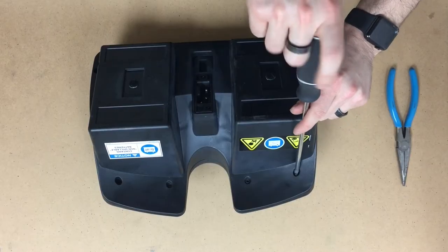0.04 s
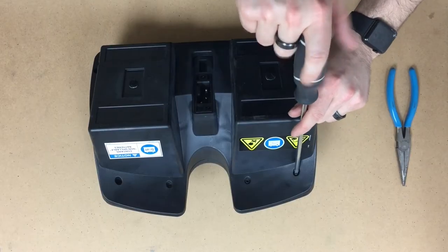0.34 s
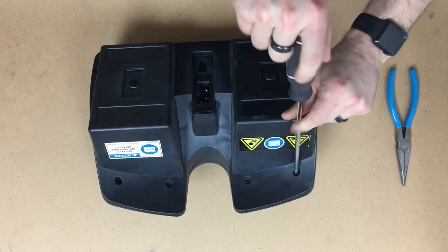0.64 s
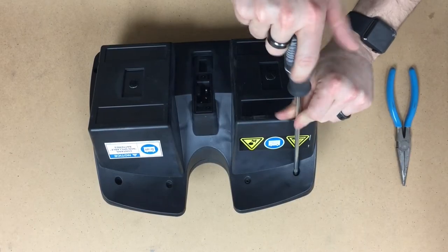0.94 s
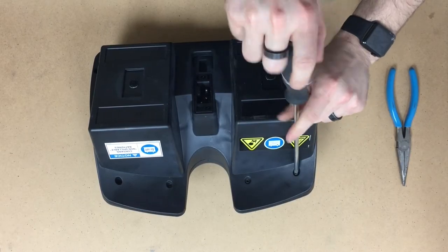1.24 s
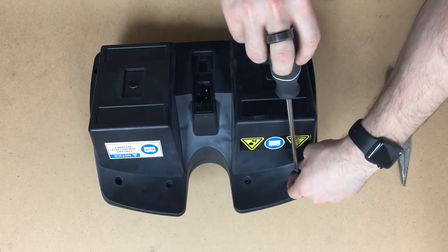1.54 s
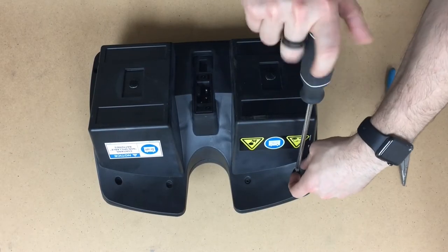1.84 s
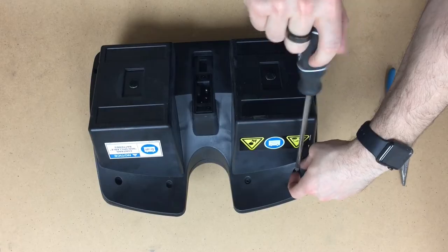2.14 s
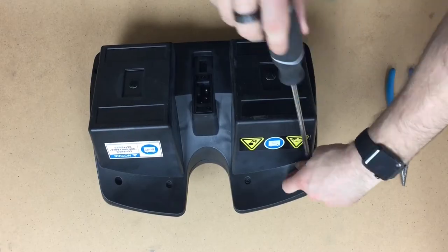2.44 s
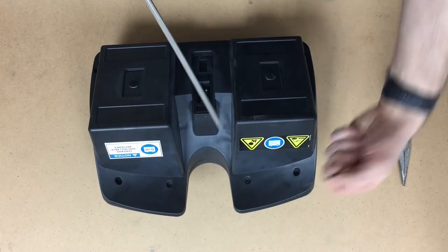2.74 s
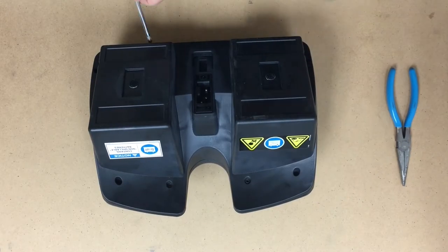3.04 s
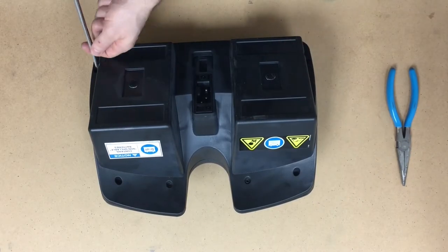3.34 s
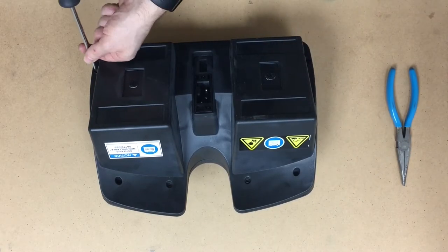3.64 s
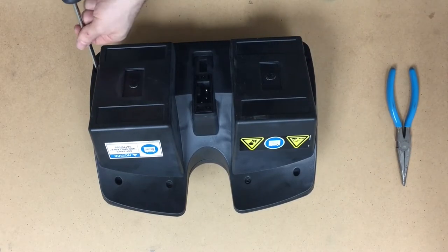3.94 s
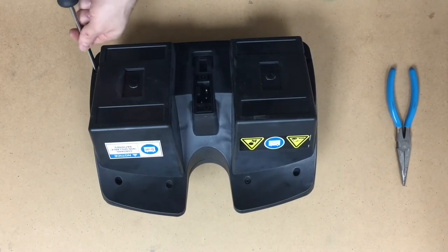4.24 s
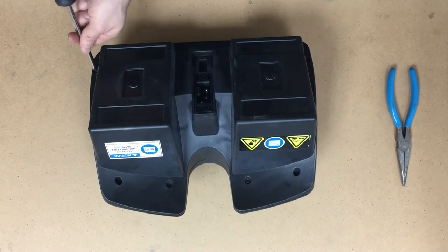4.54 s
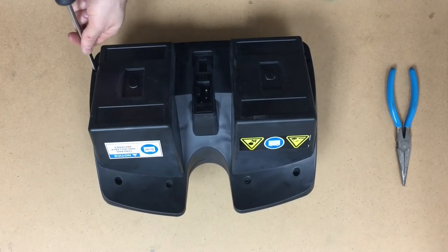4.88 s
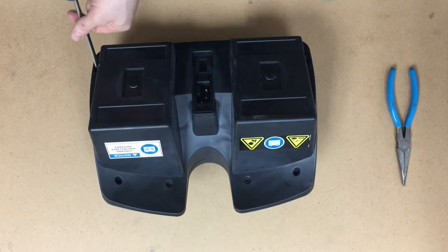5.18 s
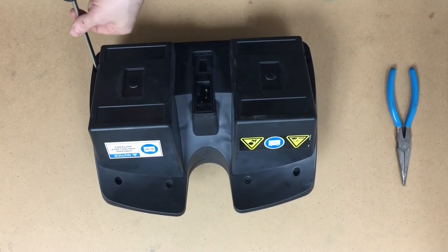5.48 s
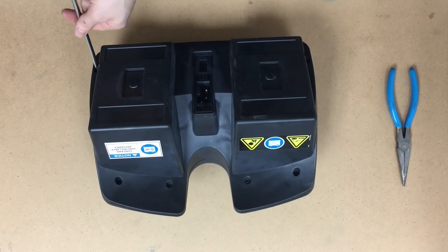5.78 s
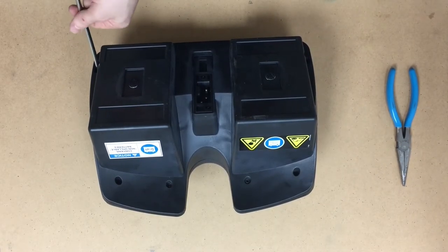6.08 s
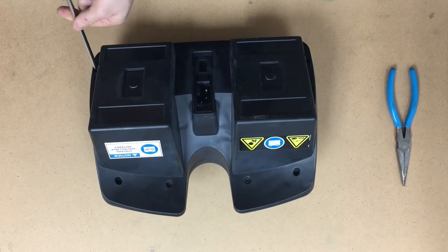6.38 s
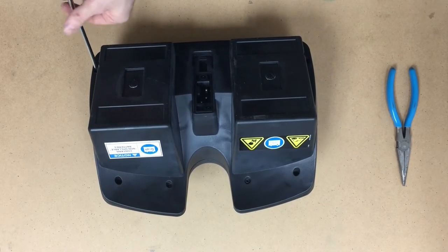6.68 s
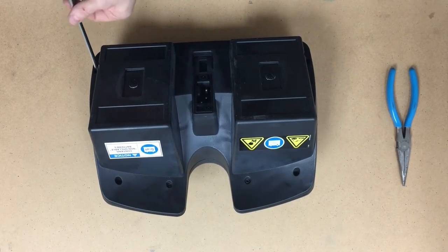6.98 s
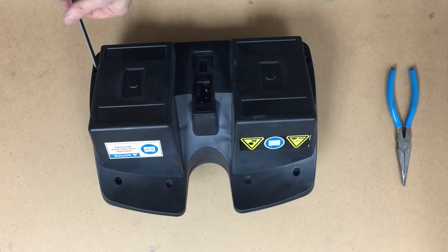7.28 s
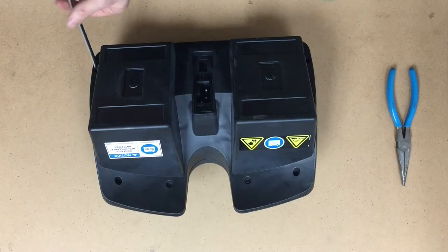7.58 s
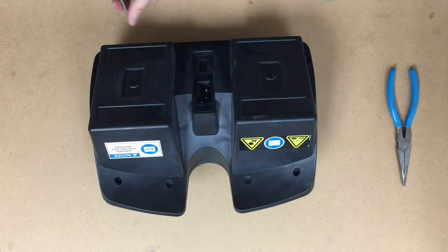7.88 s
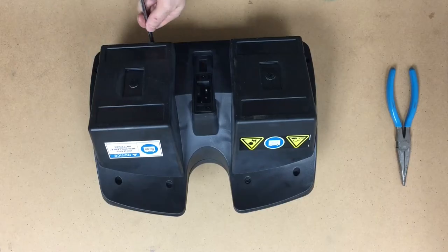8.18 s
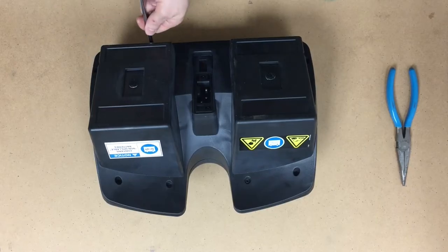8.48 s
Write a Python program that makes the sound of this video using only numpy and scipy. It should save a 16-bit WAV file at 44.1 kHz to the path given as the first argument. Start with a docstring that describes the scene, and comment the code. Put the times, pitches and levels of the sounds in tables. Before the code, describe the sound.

A fan hums and rushes softly from start to end in a small, dry room. Close by, a screwdriver works screws out of a hollow plastic case. For the first 2.6 seconds the bit rocks in the screw heads with quick, uneven clicks and ticks, and the threads grind faintly in short turns. After a brief pause, at about 3.3 seconds the tip skids over the shell and the steel shaft rings briefly, followed by three hard knocks around 3.5 seconds. Scattered clicks and quiet creaking continue, with another hard knock at 4.8 seconds. From 5 to 7.7 seconds the turning goes on with light metallic ticks, small plastic clicks and a very faint gritty sizzle. Near 8 seconds the tip skids and tinks again, with sharp knocks at about 8.1 and 8.4 seconds, then one short turn and a few faint clicks until 8.7 seconds.

```python
"""A screwdriver backs screws out of a hollow plastic case on a bench, in a small, dry room.
A fan hums from start to end. First the bit rocks and clicks in the front screws as their threads grind.
After 3 s the tip skids over the shell, ringing the steel shaft, and knocks hard at a tight rear screw.
From 5 s that screw is loose and the bit sizzles faintly in its head. Near 8 s the tip skids again,
and a few last knocks and one short turn come from the back edge."""
import sys
import numpy as np
from scipy import signal
from scipy.fft import rfft, irfft, next_fast_len
from scipy.io import wavfile
from scipy.ndimage import map_coordinates

SR = 44100
rng = np.random.default_rng(int(sys.argv[2]) if len(sys.argv) > 2 else 0)


def unload_audio(sound):
    """Save the sound as a 16-bit wav file, at the path given as the first command line argument."""
    columns = np.transpose(np.atleast_2d(sound))
    # keep every value between -1 and 1, then stretch to whole-number steps
    steps = np.round(np.clip(columns, -1, 1) * 32767)
    wavfile.write(sys.argv[1], SR, steps.astype(np.int16))


N = 384552

# The bit jolts the case: t/s, relative level/dB, hardness/dB (below 0 dull plastic, above 0 sharp steel)
KNOCKS = [(0.016, -50.5, 8), (0.0808, -46, 2), (0.143, -57.5, -5), (0.2014, -57, -12.5), (0.2631, -49.5, 5),
          (0.327, -48.5, 4), (0.393, -52.5, 8), (0.482, -60, -1), (0.618, -57, 5), (0.628, -69, -12),
          (0.642, -49.5, -5.5), (0.67, -68, -21), (0.7117, -54, -2), (0.7223, -51.5, -5),
          (0.824, -54.5, -2.5), (0.8436, -52, -0.5), (0.861, -65, -21), (0.911, -54.5, 1), (0.957, -50, -5),
          (1.03, -70, -12), (1.045, -69.5, -24), (1.1156, -51.5, -1), (1.155, -65, -10), (1.251, -53, 1),
          (1.478, -63.5, 5.5), (1.7243, -46.5, 8), (1.738, -55.5, -12), (1.883, -62.5, -15), (1.94, -61, 0),
          (2.004, -61, -1), (2.021, -57, -16.5), (2.057, -56, -5.5), (2.075, -66, -7), (2.1138, -62.5, -20),
          (2.142, -62.5, -25), (2.195, -54.5, -4), (2.26, -62, -5), (2.291, -53, 12.5), (2.322, -58.5, 6.5),
          (2.339, -59.5, -6), (2.378, -66.5, -18), (2.5061, -58.5, 4), (3.31, -52.5, 2), (3.413, -34, 5),
          (3.4358, -42.5, -8), (3.469, -35.5, 3), (3.507, -52.5, -11), (3.5715, -34.5, 0),
          (3.806, -48.5, -0.5), (3.9839, -49.5, -0.5), (4.049, -57, -12), (4.3566, -43, -1),
          (4.5497, -48.5, -3), (4.6778, -59.5, 1), (4.69, -58.5, -26), (4.748, -51, -4.5),
          (4.813, -35.5, -2.5), (4.8835, -50, -2.5), (4.902, -52, 0), (4.923, -67, -26), (4.94, -62, 5),
          (5.223, -61.5, 0), (5.537, -60.5, -5), (5.7553, -62.5, -15), (5.876, -57.5, -4),
          (6.1107, -50, 4.5), (6.318, -58, 0), (6.349, -68, -15), (6.3984, -49.5, 8), (6.418, -65, -16),
          (6.492, -60.5, -3), (6.5034, -49.5, 3.5), (6.58, -59, -1), (6.652, -57, -9), (6.666, -51.5, 5.5),
          (6.807, -66, -12), (6.856, -59, -6), (6.902, -57.5, -6), (6.98, -61, -12.5), (7.103, -50.5, 1.5),
          (7.159, -71.5, -25), (7.178, -65, -10), (7.276, -75, -19), (7.2952, -49, 2.5), (7.356, -65, -1),
          (7.381, -56, -6), (7.4434, -54.5, -1), (7.4762, -51.5, 7), (7.6273, -57, -16.5),
          (7.672, -66.5, -12), (7.736, -55, 3), (7.997, -41.5, -9), (8.1148, -33, 9), (8.165, -59, -8),
          (8.25, -51.5, 6), (8.26, -52.5, -16), (8.4427, -37, 3), (8.4704, -46, -3), (8.545, -61, -7),
          (8.668, -57, -4), (8.691, -55, -35)]
# The bit ticks in the screw head, steel on steel: t/s, relative level/dB, hardness/dB
TICKS = [(0.5806, -53, 2.5), (0.996, -51, 2.5), (2.1316, -48.5, -1.5), (2.4353, -52, 20),
         (2.4472, -48.5, 21), (2.541, -59.5, 17.5), (2.614, -66.5, 17.5), (3.653, -60, -4),
         (3.7498, -42, 2.5), (4.12, -64, -5), (4.18, -45, -2.5), (4.215, -56, -11), (4.484, -62.5, 2.5),
         (4.628, -55.5, -16), (4.713, -59, -7), (4.974, -60, -4), (5.088, -64, -6), (5.16, -51.5, 1),
         (5.32, -51.5, -2), (5.48, -53, -8), (5.5573, -52, -4), (5.669, -47.5, -4), (5.691, -51.5, -3),
         (5.773, -59, -11), (5.927, -49.5, -4), (5.944, -55.5, -4), (6.04, -49.5, -7), (6.2984, -56, -13),
         (6.5215, -55, 3), (6.773, -42.5, -1), (6.841, -52, -33), (6.9236, -54, -6), (7.0296, -45.5, -1),
         (7.557, -54.5, -10), (7.654, -59, 1.5), (7.694, -47, -4), (8.346, -58.5, -2), (8.606, -62.5, -1)]
# The free tip taps the case and the shaft rings out: t/s, relative level/dB, hardness/dB
TINKS = [(3.253, -46.5, 0), (3.276, -47, -1), (7.8084, -55.5, 9.5), (8.025, -41, -0.5), (8.061, -47.5, 2)]
# Moves between four places (front screws, tight rear screw, same screw loose, back edge): t/s
MOVES = [3, 5, 7.9]
# A knock's tone, one row a place: bass/dB, treble/dB (both against its level), bass lost/dB per hardness dB
KNOCK_TONE = [(3.5, -15, 0.497), (-4.5, -12, 0.42), (0, -14.5, 0.7432), (-4, -10, 0.0756)]
# The plastic shell's modes (pitches it rings at): f/Hz, width/Hz, then gain/dB at each of the four places
SHELL_MODES = [(673, 150, -9.5, 3.5, 0, -1.5), (1008, 93, 6, -6, -8.5, 4.5), (1195, 117, 7.5, 8, 1, -17),
               (1441, 143, 3.5, 4.5, 8, 0), (1939, 45, 4.5, 3, 5.5, 4.5), (2292, 81, -2, 6.5, 9.5, 2.5),
               (2570, 670, -17, -11, -9.5, -5), (2784, 150, -0.5, 2, 0.5, -10),
               (3635, 300, -6.5, 1.5, 7.5, 1), (4120, 370, -4.5, 7, -26, -5.5),
               (5020, 340, -12.5, -47, -5.5, -1), (5930, 540, -63, -5.5, -18, -1),
               (6850, 420, -7.5, -5, -6, -29), (8140, 800, -10.5, -5, -53, -12),
               (9550, 380, -13, -11.5, -4.5, -12), (11100, 1000, -40, -7, -12, -48)]
# The steel shaft's modes: f/Hz, width/Hz, gain/dB with the tip free, gain/dB seated in a screw head
SHAFT_MODES = [(2750, 200, -7, -8), (3716, 156, -5, 4), (4060, 210, 3, -34), (4580, 89, -4.5, -5),
               (5180, 130, -13, -11), (6900, 86, -15, -3), (8800, 150, -23, -26), (10330, 200, -48, -13),
               (11930, 120, -24, -14)]
# A thumb rests on the front edge: start/s, end/s, share of the ring lost
THUMB = (1.4, 2.7, 0.6)
# Spells of turning a screw: start/s, end/s, creak level at the end/dB
TURNS = [(0, 0.2, -63.5), (0.62, 1.07, -63.5), (1.857, 2.36, -61.5), (3.77, 4.27, -69.5),
         (4.4, 4.97, -62.5), (5.154, 6.186, -68), (6.326, 7.72, -63), (8.268, 8.698, -66)]
# The tip skids over the shell: start/s, end/s, start level/dB, end level/dB
SKIDS = [(3.256, 3.317, -53, -54), (3.32, 3.411, -65, -70), (7.746, 7.816, -62, -57),
         (8.067, 8.115, -56, -57)]
# Skin and steel squeak on plastic: middle t/s, length/s, f/Hz, width/Hz, level/dB
SQUEAKS = [(1.586, 0.099, 856, 119, -58.5), (5.22, 0.075, 7960, 200, -72.5)]
# The fan's rushing air, from low to high: f/Hz, relative level/dB
FAN_AIR = [(25, -45), (62, -39), (100, -29), (150, -19), (215, -10), (290, -6.5), (450, -3), (560, -4),
           (720, -14.5), (1050, -14), (1800, -24.5), (4000, -31.5), (11000, -38), (15800, -44.5)]
# The fan duct's modes: f/Hz, width/Hz, level/dB
DUCT_MODES = [(316, 11.6, -68.5), (366, 26, -62), (400.8, 12.7, -62.5), (512.5, 33, -67.5)]
# Steady tones of the fan and the mains power: f/Hz, level/dB
HUM_TONES = [(80, -97.5), (240, -78), (361, -71.5), (500, -71.5), (942, -82), (1001, -82.5), (1572, -80)]

BASS_HZ, TREBLE_HZ = 1700, 5500  # where a click's bass, middle and treble meet
LEAD = SR // 500  # samples of silence ahead of each blow


def clicks():
    """Each contact is a brief blow that rings the case and the shaft; harder ones sound brighter."""
    # one row for each contact
    when, level_db, hard_db = np.transpose(KNOCKS + TICKS + TINKS)[:, :, None]
    kind = np.array(["knock"] * len(KNOCKS) + ["tick"] * len(TICKS) + ["tink"] * len(TINKS))[:, None]
    place = np.searchsorted(MOVES, when.ravel())
    usual_bass_db, usual_treble_db, bass_loss = np.array(KNOCK_TONE)[place].T[:, :, None]
    bass_db = np.select([kind == "tick", kind == "tink"], [-9.5, -17], usual_bass_db - bass_loss * hard_db)
    treble_db = usual_treble_db + hard_db
    heavy = np.clip((level_db + 50) / 12, 0, 1)  # 0 for a light touch, 1 for a heavy blow
    tilt_db_per_octave = 0.34 * (treble_db - np.maximum(bass_db, -15) - 9)

    def response(f):
        octaves = np.log2(np.maximum(f, BASS_HZ) / BASS_HZ)
        brightness = amp(tilt_db_per_octave * octaves) * below(f, 14200 * (1 + heavy), order=4)
        return brightness * case_and_shaft(f, when, kind, place[:, None], heavy)

    rings = filtered(blows(level_db, treble_db), response)
    sounds = balance_bands(rings, level_db, bass_db, treble_db)
    samples = np.round(when * SR).astype(int) - LEAD + np.arange(sounds.shape[1])
    return np.bincount(np.maximum(samples, 0).ravel(), sounds.ravel(), N)[:N]  # add each at its time


def blows(level_db, treble_db):
    """Rough pushes, as bursts of noise; light, padded ones rise and fade more slowly than hard snaps."""
    t = np.arange(SR // 14) / SR
    soft = np.clip((-39.5 - level_db) / 14, 0, 1) * np.clip(-treble_db / 16, 0, 1)
    force = burst(t, rise_s=0.00012 + 0.0012 * soft, fade_s=0.024 + 0.0018 * soft)
    rough = force * rng.standard_normal(force.shape)
    return np.pad(in_room(rough, echo_db=-10, fade_s=0.065), ((0, 0), (LEAD, 0)))


def case_and_shaft(f, when, kind, place, heavy):
    """How shell and shaft ring together at each contact."""
    # ticks ring the shaft more than other contacts, and the fingers damp it differently each time
    ring_db = np.where(kind == "tick", 0, -9) + 3.5 * rng.standard_normal(when.shape)
    steel = 1 + amp(ring_db) * shaft(f, seated=True)
    detune = 1 + 0.008 * rng.standard_normal(when.shape)  # finger pressure shifts the shell's modes
    # a heavy blow keeps the tool pressed on the shell: it rattles the weak modes and damps the strong
    case = shell(f * detune, place, weak_db=-21 + 4 * heavy, scatter_db=4.5, damping_hz=95 * heavy)
    # the free shaft rings out in tinks and in heavy blows at the rear
    clang = amp(18) * (kind == "tink") + heavy * (when > MOVES[0])
    return steel * case * thumb(f, when) + clang * shaft(f, seated=False)


def balance_bands(rings, level_db, bass_db, treble_db):
    """Set how loud each click's bass, middle and treble are over its first 10 ms."""
    t = np.arange(rings.shape[1] - LEAD) / SR
    bass = filtered(rings, lambda f: below(f, BASS_HZ, order=16))
    treble = rings - filtered(rings, lambda f: below(f, TREBLE_HZ, order=12))
    first_touch = 1 + 0.36 * np.exp(-t / 0.00021)
    treble *= np.pad(first_touch, (LEAD, 0), constant_values=1)
    middle = rings - bass - treble
    sounds = 0
    for band, db in ((bass, level_db + bass_db), (middle, level_db), (treble, level_db + treble_db)):
        attack_rms = np.sqrt(np.mean(band[:, LEAD:LEAD + SR // 100] ** 2, axis=1, keepdims=True))
        sounds = sounds + band * amp(db) / attack_rms
    return sounds


def shell(f, place, weak_db, scatter_db=0, damping_hz=0):
    """The case rings in a few strong modes over many weak ones; each place stirs them differently."""
    modes = 0
    for hz, width, *struck_db in SHELL_MODES:
        mode_db = np.array(struck_db)[place] + scatter_db * rng.standard_normal(np.shape(place))
        damped_width = width + damping_hz
        modes = modes + amp(mode_db) * np.sqrt(width / damped_width) * resonance(f, hz, damped_width)
    weak_modes = amp(weak_db) * below(f, 5400, order=2)
    return (modes + weak_modes) * (1 - below(f, 490, order=4))  # a small shell gives off little bass


def shaft(f, seated):
    """The steel shaft rings, with its tip free or seated in a screw head."""
    return sum(amp(seated_db if seated else free_db) * resonance(f, hz, width)
               for hz, width, free_db, seated_db in SHAFT_MODES)


def thumb(f, when):
    """While the thumb rests on the case, it muffles the shell's second mode."""
    start, end, share_lost = THUMB
    hz, width, *_ = SHELL_MODES[1]
    resting = (when > start) & (when < end)
    return 1 - share_lost * resting * resonance(f, hz, 2 * width)


def threads():
    """The thread grinds in its plastic post in tiny slips; once the rear screw is loose, the bit sizzles."""
    t = np.arange(N) / SR
    rubs = filtered(slips(per_second=55, spread_db=6.5, fade_s=0.022), lambda f: below(f, 2400, order=3))
    rubs_by_place = np.split(rubs, np.round(np.array(MOVES) * SR).astype(int))
    creak = np.concatenate([unit(filtered(force, lambda f: shell(f, place, weak_db=-4.5)))
                            for place, force in enumerate(rubs_by_place)])
    grit = slips(per_second=30, spread_db=6, fade_s=0.026)
    sizzle = unit(filtered(grit, lambda f: resonance(f, 12500, 3500) ** 2 * shaft(f, seated=True)))
    return amp(effort_db(t)) * (creak + amp(-19.5) * sizzle * (t > MOVES[1]))


def effort_db(t):
    """In each turn the hand takes hold quickly, bears down ever harder, then eases off."""
    grip_db_per_s, build_db, ease_db_per_s = 81, 3.5, 27
    start, end, peak_db = np.transpose(TURNS)[:, :, None]
    to_go = np.clip((end - t) / (end - start), 0, 1)
    slack_db = grip_db_per_s * np.maximum(start - t, 0) + ease_db_per_s * np.maximum(t - end, 0)
    return np.max(peak_db - build_db * to_go - slack_db, axis=0)


def slips(per_second, spread_db, fade_s):
    """Rubbing surfaces stick and slip: tiny random scuffs of uneven size, each with a noisy tail."""
    t = np.arange(SR // 10) / SR
    starts = rng.random(N) < per_second / SR
    sizes = starts * amp(spread_db * np.clip(rng.standard_normal(N), -2, 1))
    scuff = burst(t, rise_s=0.0066, fade_s=fade_s)
    power = np.abs(signal.fftconvolve(sizes ** 2, scuff ** 2)[:N])
    return np.sqrt(power) * rng.standard_normal(N)


def skids():
    """The tip sticks and slips over the shell, faster when pressed harder, and rings the steel shaft."""
    t = np.arange(N) / SR
    usual_hz, usual_db, hz_per_db = 1320, -55, 18
    pressure_db = np.max([np.interp(t, [start, end], [start_db, end_db], left=-120, right=-120)
                          for start, end, start_db, end_db in SKIDS], axis=0)
    jitter = 1 + 0.02 * wobble(90) + 0.05 * wobble(900)
    slip_hz = (usual_hz + hz_per_db * (pressure_db - usual_db)) * jitter
    phase = 2 * np.pi * np.cumsum(slip_hz) / SR
    squeal = unit(sum(np.cos(harmonic * phase) for harmonic in range(3, 10)))
    rasp = unit(slips(per_second=3700, spread_db=26, fade_s=0.0099))
    force = amp(pressure_db + 3 * wobble(130)) * (amp(-4) * squeal + rasp)
    ring = filtered(force, lambda f: shaft(f, seated=False))
    return unit(ring) * np.sqrt(np.mean(amp(pressure_db) ** 2))


def squeaks():
    """Short, faint rubs on the plastic catch on one pitch, swell and fade."""
    t = np.arange(N) / SR
    swell = lambda middle, length: np.cos(np.pi * np.clip((t - middle) / length, -.5, .5))
    return sum(amp(db) * swell(middle, length) * narrow_noise(hz, width)
               for middle, length, hz, width, db in SQUEAKS)


def fan():
    """The fan's air rushes, its duct drones, and a few slightly unsteady tones hum."""
    t = np.arange(N) / SR
    air_hz, air_db = np.transpose(FAN_AIR)
    air_shape = lambda f: amp(np.interp(np.log(f + 1), np.log(air_hz), air_db))
    air = unit(filtered(rng.standard_normal(N), air_shape))
    drone = sum(amp(db) * narrow_noise(hz, width) for hz, width, db in DUCT_MODES)
    hum = sum(amp(db) * np.sqrt(2) * np.sin(2 * np.pi * hz * t + 0.63 * wobble(5.4))
              for hz, db in HUM_TONES)
    return amp(-61.5 + 1.7 * wobble(3.64)) * air + drone + hum


def in_room(x, echo_db, fade_s):
    """The bench and walls give each row of x its own short echo."""
    t = np.arange(x.shape[-1]) / SR
    tail = rng.standard_normal(x.shape) * burst(t, rise_s=0.0031, fade_s=fade_s)
    tail *= amp(echo_db) / np.linalg.norm(tail, axis=1, keepdims=True)
    return x + signal.fftconvolve(x, tail, axes=1)[:, :len(t)]


def amp(db):
    """Turn decibels into a number to multiply by."""
    return 10 ** (np.asarray(db) / 20)


def unit(x):
    """Scale x to an average strength (rms) of 1."""
    return x / np.sqrt(np.mean(x ** 2) + 1e-20)


def burst(t, rise_s, fade_s):
    """A quick rise, then a fall of 60 dB every fade_s seconds."""
    return amp(-60 * t / fade_s) * (1 - np.exp(-t / rise_s))


def wobble(per_second):
    """A smooth curve through evenly spaced random values."""
    points = rng.standard_normal(int(N * per_second / SR) + 4)
    return map_coordinates(points, [np.arange(N) * per_second / SR])


def filtered(x, response):
    """Multiply each frequency f in x by response(f)."""
    length = x.shape[-1]
    padded = next_fast_len(length + SR // 20)
    return irfft(rfft(x, padded) * response(np.fft.rfftfreq(padded, 1 / SR)), padded)[..., :length]


def resonance(f, hz, width):
    """How one mode answers each frequency f, with a peak of 1 at hz."""
    return 1j * f * width / (hz * hz - f * f + 1j * f * width)


def below(f, hz, order):
    """Let frequencies below hz through; a higher order cuts the rest more sharply."""
    return 1 / (1 + (f / hz) ** order)


def narrow_noise(hz, width):
    """A fuzzy tone: noise kept close to one pitch."""
    return unit(filtered(rng.standard_normal(N), lambda f: resonance(f, hz, 1.46 * width) ** 2))


def scene():
    """Screwdriver and case in front of the fan's hum, in one channel."""
    return (amp(1.3) * clicks() + threads() + skids() + squeaks() + fan())[None]


def record(dry):
    """Cut away the very highest treble."""
    return filtered(dry, lambda f: f < 15900)


dry = scene()
out = record(dry)
unload_audio(out)
```